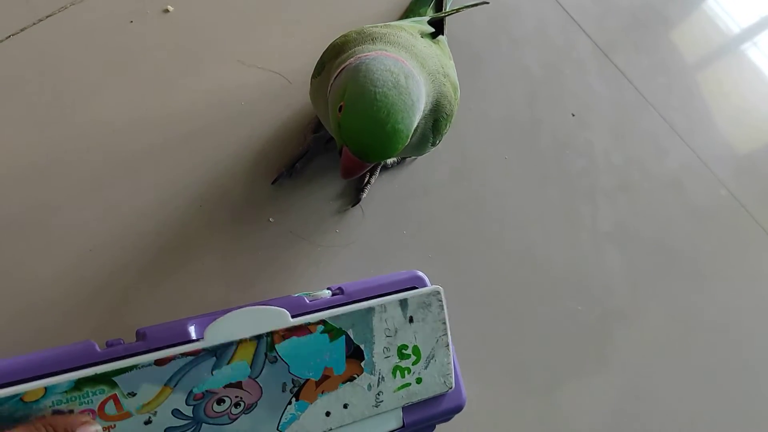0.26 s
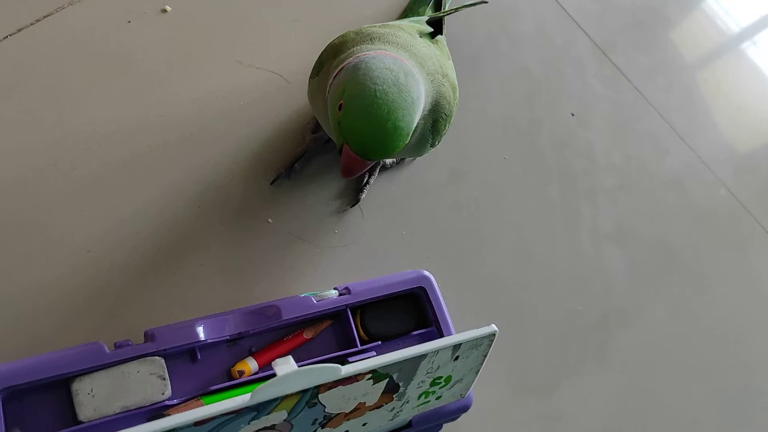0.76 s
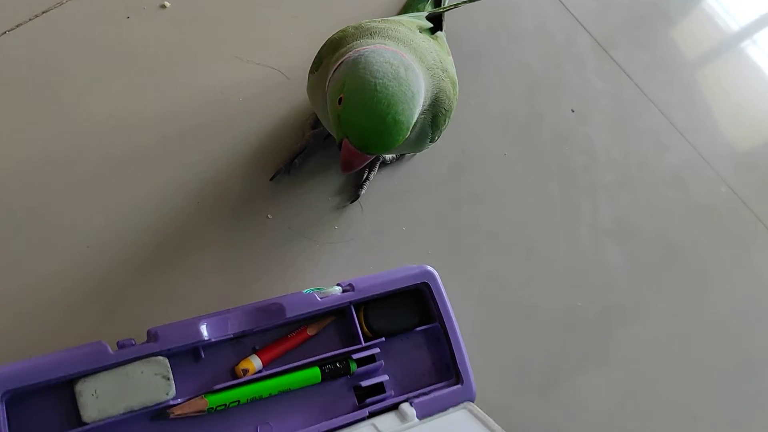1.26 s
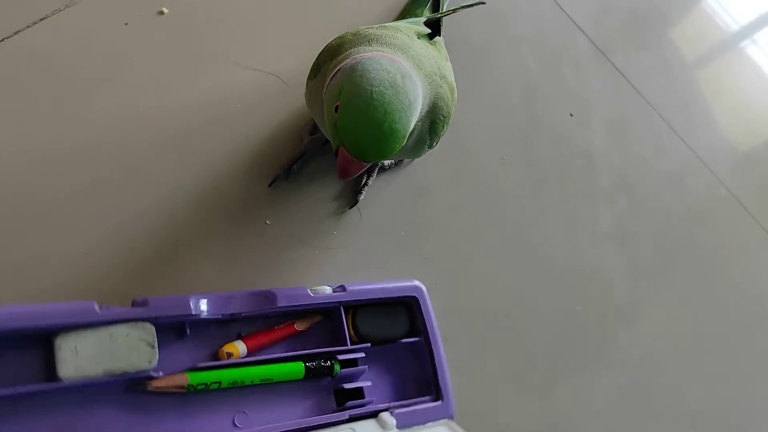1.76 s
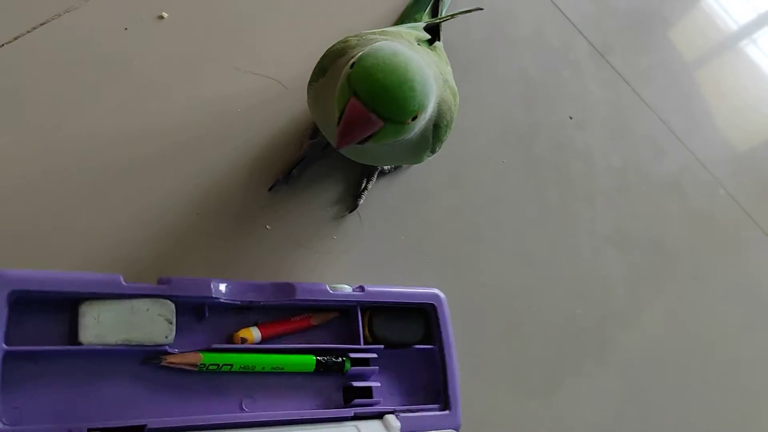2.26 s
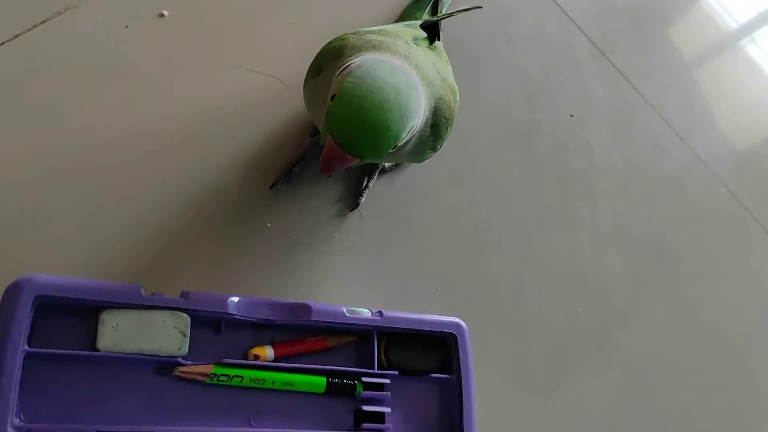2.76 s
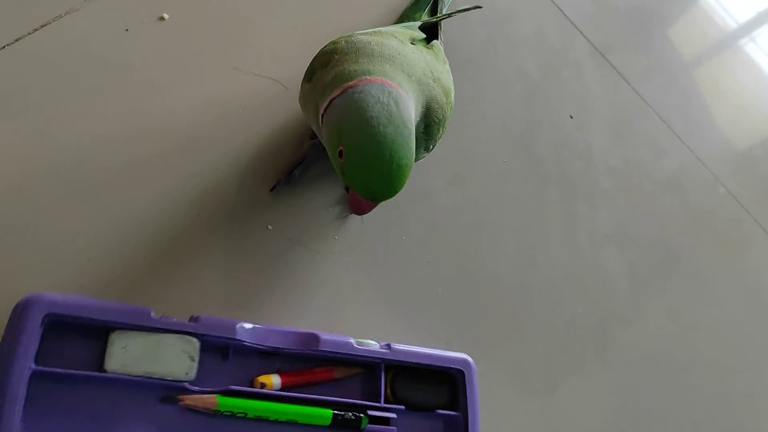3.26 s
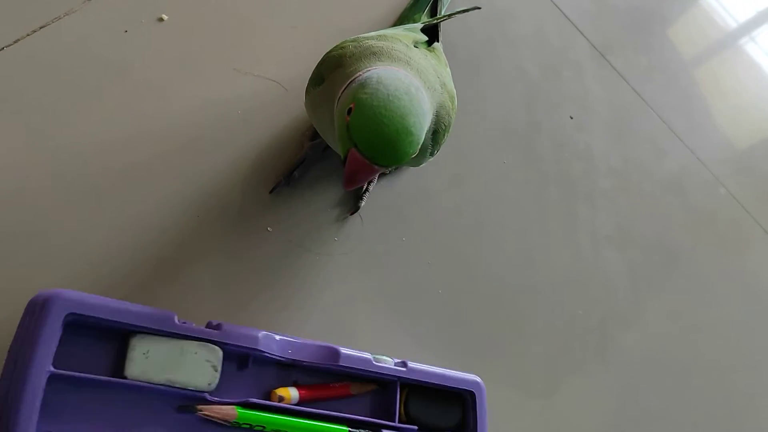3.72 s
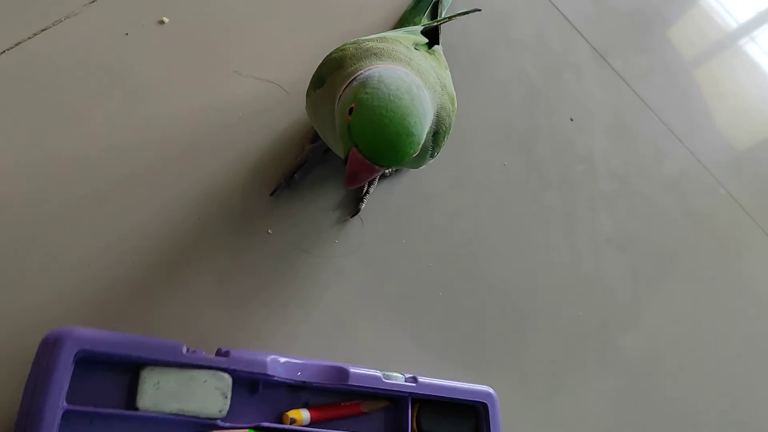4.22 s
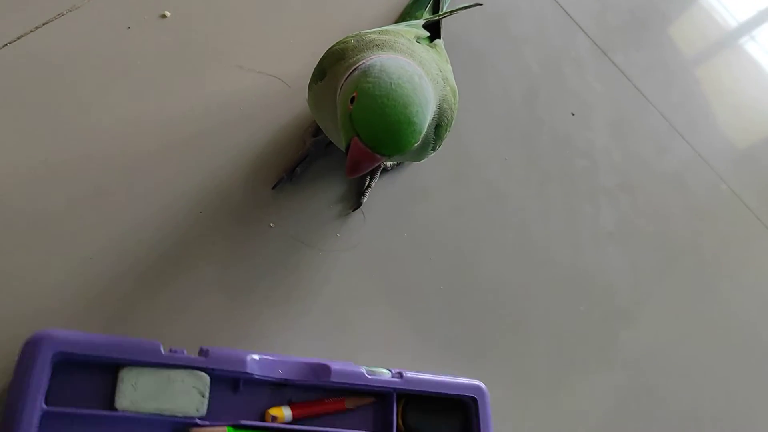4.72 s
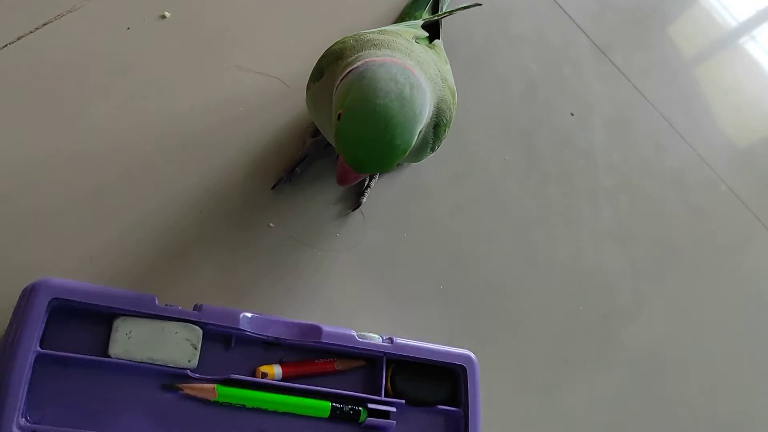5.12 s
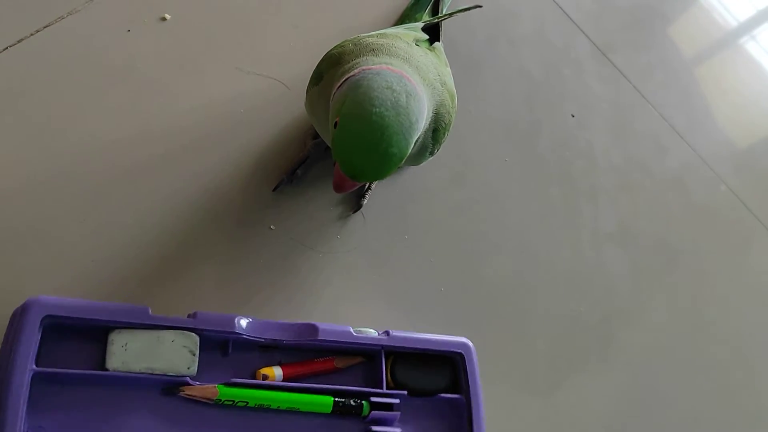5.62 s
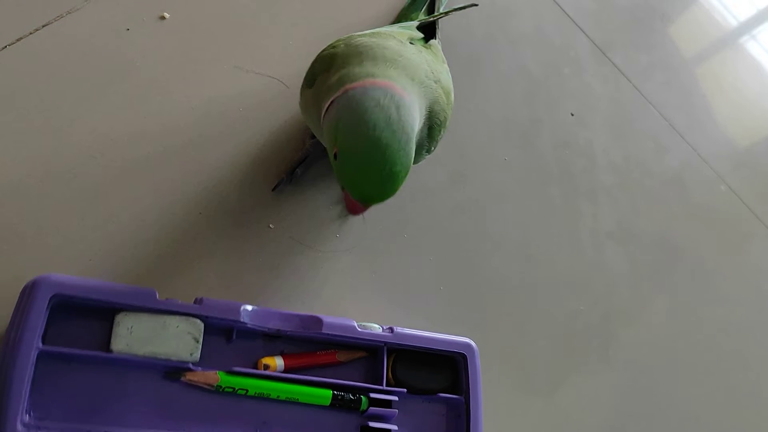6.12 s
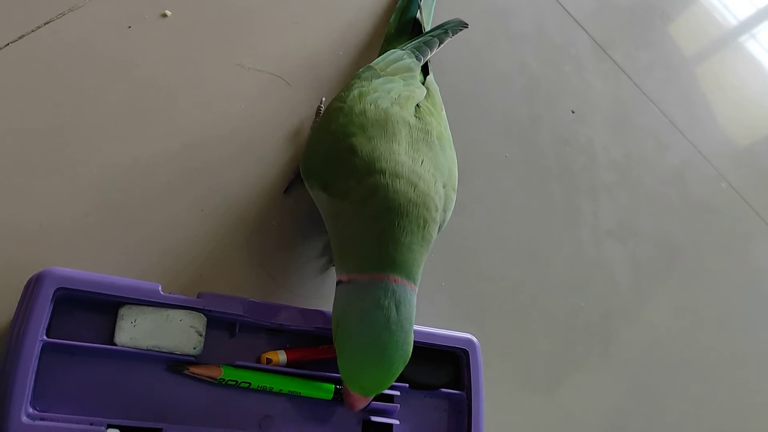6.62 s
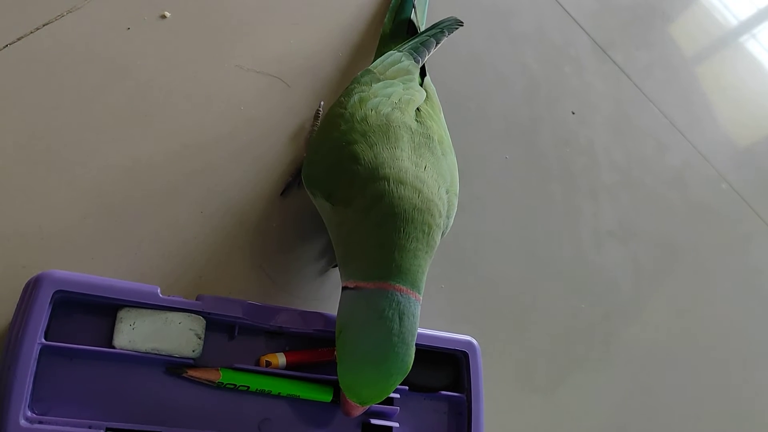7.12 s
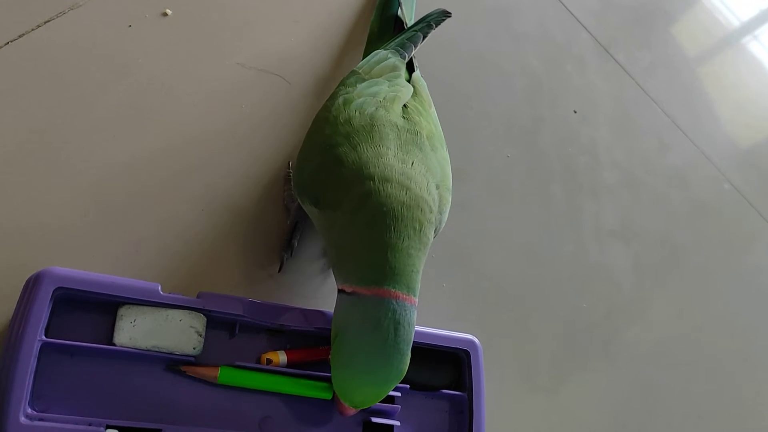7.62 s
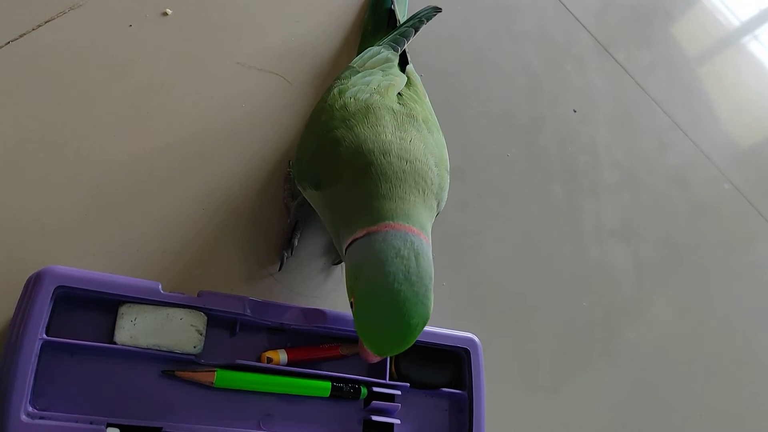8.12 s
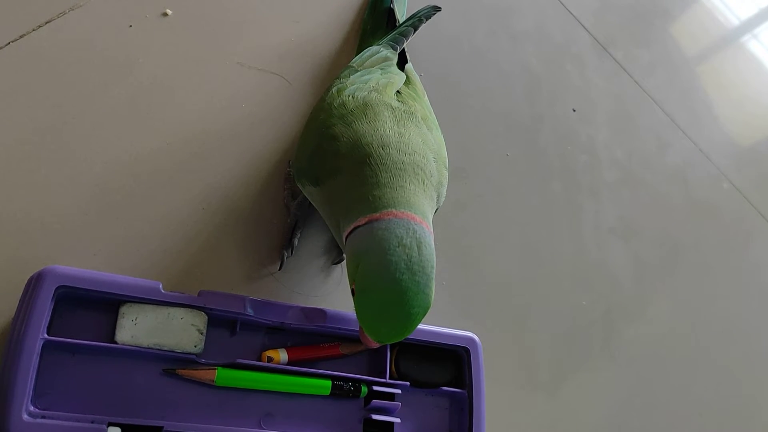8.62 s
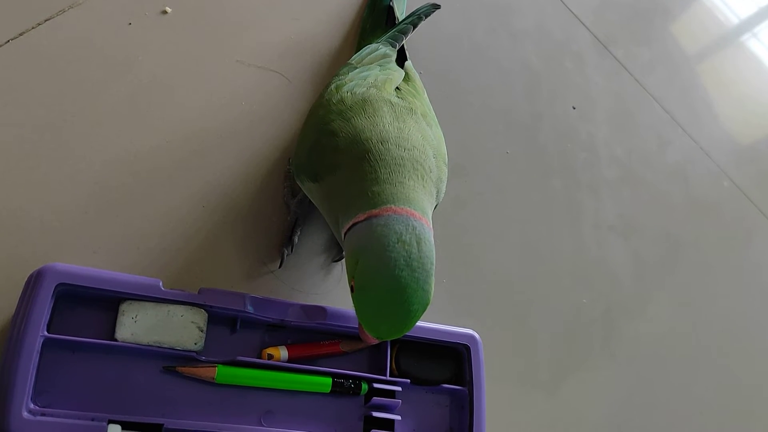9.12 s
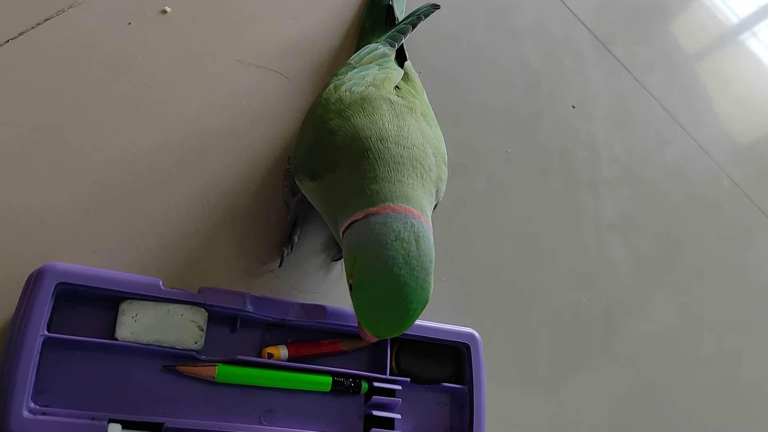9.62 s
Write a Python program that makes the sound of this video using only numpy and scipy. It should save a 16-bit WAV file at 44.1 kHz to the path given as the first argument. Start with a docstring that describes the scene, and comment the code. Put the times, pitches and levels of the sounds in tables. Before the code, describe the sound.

Close up in a hard-walled room, a plastic pencil box lid opens with tiny clicks. The box is then knocked repeatedly on the tiled floor, hollow thumps with bouncing clacks and rattling pencils, gradually weakening. Early on a parakeet gives one shrill, falling squawk. Finally its beak taps softly in the tray, ending with two firm knocks, then faint swishes over quiet room air.

```python
"""A plastic pencil box, close to a phone in a hard-walled room: its lid is unlatched and swung open with small clicks.
Then it is knocked on a tiled floor and rebounds while its pencils jump; each contact is a hollow thump, clack and tick.
Early in the knocking a parakeet squawks once: rasp, harmonic whistle, break, falling screech, over a low noise rumble.
At last it pecks among the pencils and drags its beak along the tray. Soft noise swishes run throughout, faint sine
tones come late; the room rings after box and bird, over low air noise, hum and hiss."""
import sys
import numpy as np
from scipy import signal
from scipy.fft import rfft, irfft, next_fast_len
from scipy.io import wavfile
from scipy.ndimage import uniform_filter1d, minimum_filter1d

SR = 44100
rng = np.random.default_rng(int(sys.argv[2]) if len(sys.argv) > 2 else 0)


def pcm_store(signal):
    """Save signal as 16-bit PCM."""
    levels = np.round(np.clip(np.atleast_2d(signal), -1, 1) * 32767)
    wavfile.write(sys.argv[1], SR, levels.astype(np.int16).T)


N = 435266
TIME = np.arange(N) / SR

# spectrum of soft hiss and swishes: (frequency [Hz], level [dB])
HISS_COLOUR = [(900, 2), (2000, -5), (3500, -10.5), (5500, -10.5), (7500, -2), (9200, -10.5), (10200, -30),
               (15000, -31.5)]


def undb(db):
    """Decibels to gain."""
    return 10 ** (np.asarray(db) / 20)


def unit(x):
    """Scale to rms 1."""
    return x / np.sqrt(np.mean(x ** 2))


def at(points, hz):
    """Read (Hz, value) points on a log-frequency axis."""
    point_hz, value = np.transpose(points)
    return np.interp(np.log(np.maximum(hz, 1)), np.log(point_hz), value)


def slope(points, hz):
    """Spectrum in dB, falling 20 dB per octave beyond its ends, by 80 dB at most."""
    hz = np.maximum(hz, 1)
    octaves_below = np.maximum(np.log2(points[0][0] / hz), 0)
    octaves_above = np.maximum(np.log2(hz / points[-1][0]), 0)
    return at(points, hz) - 20 * np.minimum(octaves_below + octaves_above, 4)


def colour(x, points):
    """Filter by a spectrum, zero phase."""
    size = next_fast_len(x.shape[-1])
    gain = undb(slope(points, np.fft.rfftfreq(size, 1 / SR)))
    return irfft(rfft(x, size) * gain, size)[..., :x.shape[-1]]


def causal(db):
    """Minimum-phase response to a blow, from its spectrum in dB, by folding the cepstrum."""
    cepstrum = irfft(db * np.log(10) / 20)
    half = len(cepstrum) // 2
    cepstrum[1:half] *= 2
    cepstrum[half + 1:] = 0
    return np.exp(rfft(cepstrum))


def walk(rate_hz):
    """Random values at a given rate, joined by lines; spread near 1."""
    steps = TIME * rate_hz
    count = int(steps[-1]) + 2
    return 1.2 * np.interp(steps, np.arange(count), rng.standard_normal(count))


def two_sided(mid, side, apart):
    """Left and right from a common part and an opposed part."""
    return np.array([mid + apart * side, mid - apart * side])


def noise(points, apart):
    """Coloured noise at two ports, partly unrelated."""
    mid, side = rng.standard_normal((2, N))
    return unit(colour(two_sided(mid, side, apart), points))


def swell(start, hold, attack, release):
    """Gain that climbs 60 dB per attack time, holds, and falls 60 dB per release time (all in s)."""
    outside = np.maximum((start - TIME) / attack, 0) + np.maximum((TIME - start - hold) / release, 0)
    return np.exp(-np.log(1000) * np.minimum(outside, 10))


def bounces():
    """Each blow lands the box, drops the pencils back and rebounds twice, each rebound after a faint lead-in."""
    # knocks on the tiles: (time [s], level [dB], hardness [dB], pencils' flight [s], pencils re blow [dB],
    #                       box's flight [s], first rebound re blow [dB], second rebound re blow [dB])
    blows = [(2.0617, -13, -7.5, .044, -9, .101, -13, -30),
             (2.456, -12.5, -10.5, .041, -14, .105, -12.5, -13.5),
             (3.2717, -13, -9, .022, -14, .099, -13, -16),
             (3.6452, -14.5, -11, .036, -11, .1025, -7.5, -18),
             (4.0234, -16, -12.5, .038, -24, .0935, -5.5, -32),
             (4.4116, -16, -10.5, .0305, -13, .094, -4, -34), (4.749, -25, -8, .041, -5, .0555, 2.5, -4),
             (5.2095, -16, -10, .0315, -8, .0075, -9, -25), (5.603, -17.5, -6, .037, -13, .014, 1.5, -20),
             (5.993, -22, -4.5, .029, -9, .014, -2, -7), (6.262, -35.5, -11.5, .03, -16, .011, 3.5, -20)]
    drop_hard_db, rebound_hard_db = -4, -2  # falling pencils and each landing are softer
    flight_ratio = .56  # second flight over first
    lead_in_s, lead_in_db = .004, -9  # time before the rebound, level re rebound
    rows = []
    for s, db, hard_db, drop_s, drop_db, flight_s, first_db, second_db in blows:
        rows.append((s, db, hard_db))
        rows.append((s + drop_s, db + drop_db, hard_db + drop_hard_db))
        first_s = s + flight_s
        second_s = s + flight_s * (1 + flight_ratio)
        for landing_s, rebound_db in ((first_s, first_db), (second_s, second_db)):
            hard_db = hard_db + rebound_hard_db
            rows.append((landing_s - lead_in_s, db + rebound_db + lead_in_db, hard_db))
            rows.append((landing_s, db + rebound_db, hard_db))
    return rows


def ripple(hz, spacing_hz):
    """Random dB offsets over frequency: each blow lands elsewhere and favours other modes."""
    return np.interp(hz / spacing_hz, np.arange(512), rng.standard_normal(512))


def contacts(table, ring_hz, clack_db, bass_db, vary_db, chatter_s, snap, apart, size=4096):
    """Each contact thumps the box, highs first and the ring after; the plastic snaps once, then chatters."""
    # hollow thump when the box rings at table_ring_hz: (frequency [Hz], level [dB])
    thump_colour = [(60, -34), (130, -18), (200, -10.5), (330, -16.5), (450, -19.5), (550, -17),
                    (660, -6.5), (820, 1), (1120, -7.5), (1450, -20), (2000, -21.5), (3200, -33.5),
                    (6000, -54)]
    # resonances that hold the thump back for a few cycles: (centre [Hz], width [Hz])
    hold = [(750, 280), (900, 650), (700, 700), (170, 130)]
    # clack of hard plastic: (frequency [Hz], level [dB])
    clack_colour = [(400, -16), (900, -7.5), (1600, 0.5), (2400, 1.5), (3600, -3.5), (4700, -5),
                    (6000, -13), (9000, -23.5)]
    # bright tick of the contact itself: (frequency [Hz], level [dB])
    tick_colour = [(3500, -18), (5500, -6.5), (7300, 3), (9100, -0.5), (10200, -23.5), (12500, -27),
                   (15000, -25)]
    table_ring_hz, ring_scatter = 952, .03  # scatter is a share, drawn per contact
    clack_share = .62  # clack dB per dB of hardness; hardness is tick level over thump level

    out = np.zeros((2, N + size))
    hz, t = np.fft.rfftfreq(size, 1 / SR), np.arange(size) / SR
    norm = np.sqrt(SR / 100)  # thump level as rms over 10 ms
    burst = np.exp(-t / chatter_s) * (1 - np.exp(-t / 0.00057))
    burst /= np.linalg.norm(burst)
    for s, thump_db, hard_db in table:
        own_hz = hz * table_ring_hz / ring_hz * (1 + ring_scatter * rng.standard_normal())
        bass_shelf_db = bass_db / (1 + (hz / 450) ** 4)
        body = causal(slope(thump_colour, own_hz) + bass_shelf_db + vary_db * ripple(hz, spacing_hz=163.0))
        for centre_hz, width_hz in hold:  # all-pass: delay only
            pole = centre_hz ** 2 - own_hz ** 2 + 1j * width_hz * own_hz
            body = body * np.conj(pole) / pole
        thump = irfft(body)
        sound = thump / np.linalg.norm(thump)
        for points, db in ((clack_colour, clack_db + clack_share * hard_db), (tick_colour, hard_db)):
            mid, side = rng.standard_normal((2, size)) * burst
            mid[rng.integers(20, 50)] += snap
            crack = irfft(rfft(two_sided(mid, side, apart)) * causal(slope(points, hz)))
            sound = sound + crack * undb(db) * np.sqrt(2) / np.linalg.norm(crack)
        start = int(s * SR)
        out[:, start:start + size] += norm * undb(thump_db) * sound
    return out[:, :N]


def syrinx(hz, gain, over_db, rough, throat, jitter, flutter_db, count=8):
    """Harmonic voice through the throat; roughness shakes its pitch and each partial's strength."""
    on = gain > 1e-3  # compute only where audible
    hz, gain, over_db, rough = (np.broadcast_to(c, N)[on] for c in (hz, gain, over_db, rough))
    shaken_hz = hz * (1 + jitter * rough * walk(800)[on])
    phase = 2 * np.pi * np.cumsum(shaken_hz) / SR
    k = np.arange(1, count + 1)[:, None]
    below_nyquist = k * hz < SR / 2
    gains = undb(slope(throat, k * hz) + over_db * (k > 1)) * below_nyquist
    flutter = undb(flutter_db * rough * np.array([walk(500)[on] for _ in k]))
    partials = gains * flutter * np.sin(k * phase + rng.uniform(0, 2 * np.pi, (count, 1)))
    out = np.zeros(N)
    out[on] = gain * partials.sum(0) / np.sqrt((gains ** 2).sum(0) / 2)
    return out


def whistle():
    """Arch of pitch, overtones strongest at its crest, that roughens just before the voice breaks."""
    # throat and beak nearly closed: (frequency [Hz], level [dB])
    narrow = [(3300, -5.5), (3700, 1), (6700, -4.5), (7300, -8.5), (10300, -18), (11000, -18.5),
              (13500, -26.5), (14600, -12.5), (16500, -35.5)]
    start_s, crest_s, break_s = 2.771, 2.838, 2.897
    start_hz, crest_hz, break_hz = 3345, 3690, 3186
    level_db, crest_overtones_db, overtones_db_per_hz = -9, 1, .01
    clear_rough, break_rough, roughen_s = .06, .7, .018  # break adds to clear

    rising = np.clip((crest_s - TIME) / (crest_s - start_s), 0, 2)
    falling = np.clip((TIME - crest_s) / (break_s - crest_s), 0, 2)
    hz = crest_hz - (crest_hz - start_hz) * rising ** 2 - (crest_hz - break_hz) * falling ** 2
    gain = undb(level_db) * swell(start_s, break_s - start_s, attack=.007, release=0.024)
    over_db = crest_overtones_db - overtones_db_per_hz * (crest_hz - hz)
    rough = clear_rough + break_rough * np.exp(np.minimum(TIME - break_s, 0) / roughen_s)
    return syrinx(hz, gain, over_db, rough, narrow, jitter=.024, flutter_db=3)


def screech():
    """Rough falling cry in a lower register whose overtones take over as the beak opens."""
    # course after the break: (time [s], pitch [Hz], level [dB], overtones [dB])
    course = [(2.9, 2420, -13, 0), (2.913, 2310, -11, 1), (2.928, 2175, -18.5, 3), (2.95, 1950, -10, 4),
              (2.982, 1805, -11.5, 6), (3.004, 1735, -14.5, 9), (3.016, 1620, -22, 9)]
    # throat and beak wide open: (frequency [Hz], level [dB])
    wide = [(1600, -10.5), (1950, -4), (2400, -6.5), (3550, -0.5), (4600, -2.5), (5600, -1), (6500, -14),
            (7500, -1.5), (9200, -2), (10500, -27.5), (13000, -25), (16000, -31)]
    s, *controls = np.transpose(course)
    hz, db, over_db = (np.interp(TIME, s, c) for c in controls)
    gain = undb(db) * swell(s[0], s[-1] - s[0], attack=.02, release=.025)
    return syrinx(hz, gain, over_db, .62, wide, jitter=.024, flutter_db=7)


def squawk():
    """Short growing noise rasp, arched whistle, then a drop to a falling screech with a noisy edge."""
    # rasp and screech noise: (frequency [Hz], level [dB])
    rasp_colour = [(120, -62.5), (200, -33), (789, -10.5), (1130, -18), (1980, -5), (2420, -12.5),
                   (3600, -3.5), (6530, -8), (8410, -2.5), (11900, -41), (15000, -65)]
    rasp_s, rasp_length_s = 2.753, .012
    rasp_start_db, growth_db_per_s = -20, 1000
    cry = screech()
    cry_envelope = np.sqrt(np.abs(uniform_filter1d(cry ** 2, size=300)))
    noisy_edge = undb(-15) * cry_envelope
    rasp_db = rasp_start_db + growth_db_per_s * np.clip(TIME - rasp_s, 0, rasp_length_s)
    rasp = undb(rasp_db) * swell(rasp_s, rasp_length_s, attack=.005, release=.007)
    return whistle() + cry + (noisy_edge + rasp) * noise(rasp_colour, apart=.7)


def rumble():
    """Uneven low noise that rises and dies with the squawk."""
    # rumble: (frequency [Hz], level [dB])
    rumble_colour = [(20, 2.5), (45, -5), (70, -12.5), (120, -8), (180, -8), (330, -8), (520, -15.5),
                     (760, -10), (1700, -18.5), (2500, -38)]
    start_s, length_s, level_db = 2.855, .075, -21
    gain = undb(level_db) * swell(start_s, length_s, attack=.33, release=.3)
    return gain * unit(noise(rumble_colour, apart=0.44) * undb(2 * walk(90)))


def scrape():
    """Beak drags along the tray, sticking and slipping over ribs: noise of randomly flickering level."""
    # scrape: (frequency [Hz], level [dB])
    scrape_colour = [(120, -38), (200, -14), (437, -2), (532, -5), (694, -7), (2280, -6), (4650, -16),
                     (7790, -12), (8980, -23), (10200, -53), (14000, -57)]
    start_s, length_s, level_db = 7.865, 0.053, -47.5
    gain = undb(level_db) * swell(start_s, length_s, attack=0.055, release=0.52)
    return gain * unit(noise(scrape_colour, apart=0.55) * undb(3.7 * walk(360)))


def rustle():
    """Fingers, plastic and feathers brush: random tiny slips dense enough to blur into soft swishes."""
    # swishes: (time [s], length [s], level [dB])
    swishes = [(0.386, 0.043, -55), (.57, 0.044, -61), (.86, .08, -52), (1.094, 0.069, -58),
               (1.302, 0.049, -51), (1.92, .1, -52), (2.15, 2.92, -57), (2.68, .07, -50),
               (5.348, 0.53, -60), (6.662, 0.15, -58), (8.08, .19, -53), (8.52, 0.057, -62),
               (9.031, 0.09, -57.5), (9.36, .1, -63)]
    attack_s, release_s = 0.33, .7
    slips = rng.standard_normal((2, N)) * undb(1.5 * walk(150))
    gain = sum(undb(db) * swell(s, length_s, attack_s, release_s) for s, length_s, db in swishes)
    return gain * unit(colour(slips, HISS_COLOUR))


def tones():
    """Faint, slightly wavering sines that fade in and out."""
    # tones: (time [s], length [s], pitch [Hz], level [dB])
    tone_rows = [(8.83, .12, 178, -58.5), (9.06, .13, 930, -70), (9.32, .22, 1935, -75)]
    waver = .006  # share of pitch
    out = 0
    for s, length_s, hz, db in tone_rows:
        phase = 2 * np.pi * np.cumsum(hz * (1 + waver * walk(60))) / SR
        gain = undb(db) * np.sqrt(2) * swell(s, length_s, attack=.3, release=.5)
        out = out + gain * np.sin(phase)
    return out


def background():
    """Low room air, a faint mains hum and a soft hiss, each of wandering level."""
    # room air: (frequency [Hz], level [dB])
    air_colour = [(12, -29), (20, -1), (46, -1.5), (70, -10.5), (173, -5.5), (223, -9), (318, -6),
                  (585, -14.5), (889, -19.5), (1070, -22), (1170, -28.5), (1700, -40), (3000, -32),
                  (3900, -64.5), (6600, -120)]
    # hiss level: (time [s], level [dB])
    hiss_course = [(0, -66), (6.4, -70.5), (7.1, -77), (8.9, -72.5), (9.87, -69)]
    air_db, hum_hz, hum_db = -60, 102, -67
    air = undb(air_db + walk(4.4)) * noise(air_colour, apart=.7)
    hum = undb(hum_db + 2 * walk(3)) * np.sqrt(2) * np.sin(2 * np.pi * hum_hz * TIME)
    hiss_db = np.interp(TIME, *np.transpose(hiss_course)) + walk(57)
    return air + hum + undb(hiss_db) * noise(HISS_COLOUR, apart=0.73)


def room(x, near_db, near_s, late_db):
    """Dense reflections from floor and near walls die fast; the whole room rings on more slowly."""
    # room bands: (frequency [Hz], t60 of the late tail [s], level [dB])
    bands = [(149.8, 1, 3), (400, 0.82, 2), (890, .55, -7), (1940, 0.6, -0.5), (4400, 0.98, -1.5),
             (8200, .58, -0.5), (14010, .35, -6)]
    t = np.arange(SR) / SR
    hz = np.fft.rfftfreq(SR, 1 / SR)
    early_spread_db = 8.5 * np.exp(-t / 0.09)  # sparse, uneven start
    mid, side = rng.standard_normal((2, SR)) * undb(early_spread_db * rng.standard_normal((2, SR)))
    apart = np.minimum(0.33 + hz / 2000, 1)  # long waves reach both ports alike
    spectrum = two_sided(rfft(mid), rfft(side), apart) / np.sqrt(1 + apart ** 2)
    near = np.exp(-t / near_s) * np.clip((t - .004) / 0.0023, 0, 1)
    near_decay = undb(near_db) * near / np.linalg.norm(near)
    response = 0
    for band_hz, t60_s, db in bands:
        share = at([(row[0], float(row[0] == band_hz)) for row in bands], hz)  # triangular band
        late = np.exp(-np.log(1000) * t / t60_s) * np.clip((t - .008) / 0.017, 0, 1)
        decay = np.hypot(near_decay, undb(late_db) * late / np.linalg.norm(late))
        response = response + undb(db) * decay * irfft(spectrum * share, SR)
    return x + signal.fftconvolve(x.mean(0)[None], response, axes=1)[:, :N]


def ports(x, balance, lag):
    """The phone's body shades the two ports differently; the left one hears a little later."""
    size = next_fast_len(N)
    hz = np.fft.rfftfreq(size, 1 / SR)
    tilt = undb(at(balance, hz))
    left = tilt * np.exp(-2j * np.pi * hz * at(lag, hz))
    gains = np.array([left, np.ones_like(tilt)]) * np.sqrt(2 / (1 + tilt ** 2))
    return irfft(rfft(x, size) * gains, size)[:, :N]


def scene():
    """Box, bird and room as they reach the two ports."""
    # contacts of the lid unlatched and swung open: (time [s], level [dB], hardness [dB])
    lid_touches = [(.074, -55, 3), (.096, -53, 8), (.264, -53, -14), (.383, -56, 7.5), (.438, -53, -14),
                   (.452, -42, -22), (.575, -54, -6), (.603, -51, -16), (.78, -53.5, 12), (.792, -45, 7.5),
                   (.853, -54, 10), (1.013, -59, 5), (1.181, -48, -21), (1.263, -60.5, 13), (1.308, -57, 9),
                   (1.327, -52, 3), (1.376, -32, -11), (1.383, -36, -7), (1.389, -31, -25),
                   (1.467, -39.5, -32.5), (1.495, -44, 8), (1.512, -41, -5), (1.684, -54.5, -22),
                   (1.747, -57, 13.5), (1.904, -60, 9)]
    # loose pencils click in the tray: (time [s], level [dB], hardness [dB])
    pencil_clicks = [(2.217, -50.5, 13), (2.249, -38.5, -16), (3.245, -41.5, -1), (3.262, -27, -17),
                     (3.516, -52, 9.5), (3.955, -56, 20), (4.201, -38.5, -16), (4.491, -35, -9),
                     (5.4, -49.5, -25.5), (6.172, -47, -28), (6.239, -47.5, -12)]
    # beak taps pencils and tray: (time [s], level [dB], hardness [dB])
    beak_taps = [(6.787, -49, -16), (6.939, -55, -24), (6.968, -46, -17.5), (7.016, -52, -31),
                 (7.132, -56.5, -27), (7.238, -46, -18), (7.352, -53.5, -22), (7.39, -53.5, -17),
                 (7.512, -48.5, -20), (7.539, -39, -16), (7.595, -43.5, -19), (7.635, -53, -16),
                 (7.722, -47.5, -30), (7.78, -43.5, -22), (7.828, -45.5, -19), (7.973, -42, -28),
                 (8.149, -25, -16.5), (8.236, -19.5, -15.5)]
    # box and bird at the ports: (frequency [Hz], left minus right [dB])
    box_balance = [(100, 4.5), (300, 9.5), (550, 3.5), (850, 3.5), (1150, 11.5), (1800, -5), (3500, 2),
                   (5500, -5.5), (7300, -9), (9000, 9), (14000, -0.5)]
    bird_balance = [(100, 2), (1200, 2), (2400, 0.5), (3700, -3), (8000, 0.5), (14000, -1)]
    # delay of the left port: (frequency [Hz], lag [s])
    box_lag = [(1000, .00009), (8000, .000085)]
    bird_lag = [(3500, .000058), (5500, .000065), (7300, .000085), (9300, .000098), (11000, .00008),
                (14500, .000052)]

    lid = contacts(lid_touches, ring_hz=990, clack_db=-2, bass_db=1.5, vary_db=3.5,
                   chatter_s=0.011, snap=0.44, apart=0.96)
    knocks = contacts(bounces() + pencil_clicks, ring_hz=980, clack_db=-4.5, bass_db=.5, vary_db=3.0,
                      chatter_s=.0035, snap=0.64, apart=0.42)
    pecks = contacts(beak_taps, ring_hz=985, clack_db=-3, bass_db=-7.5, vary_db=3.5,
                     chatter_s=0.00078, snap=0.5, apart=1.0)
    box = room(lid, near_db=-4.5, near_s=0.042, late_db=-8.5)
    box += room(knocks, near_db=-7, near_s=0.048, late_db=-16)
    box += room(pecks + scrape(), near_db=-7.5, near_s=.03, late_db=-14.5)
    bird = room(squawk(), near_db=-12, near_s=.06, late_db=-14)
    box_side = ports(box + rustle() + tones(), box_balance, box_lag)
    bird_side = ports(bird + rumble(), bird_balance, bird_lag)
    return box_side + bird_side + background()


def record(dry):
    """Peaks over full scale are smoothly turned down; a steep low-pass cuts the top."""
    top_hz = 16000
    peak_gain = np.minimum(1, 1 / (np.abs(dry).max(0) + 1e-9))
    gain = uniform_filter1d(minimum_filter1d(peak_gain, size=121), size=121)
    low_pass = signal.ellip(8, .2, 70, top_hz, fs=SR, output="sos")
    return signal.sosfilt(low_pass, dry * gain)


dry = scene()
out = record(dry)
pcm_store(out)
```